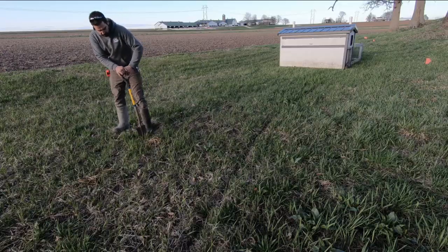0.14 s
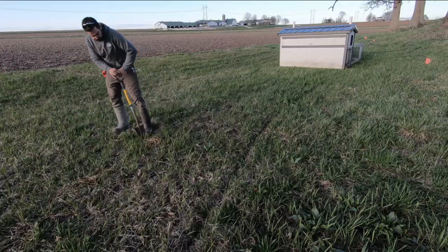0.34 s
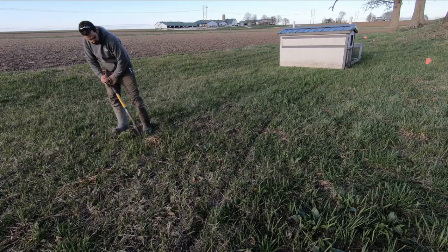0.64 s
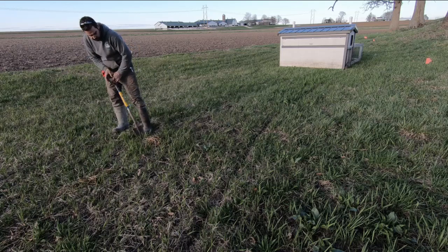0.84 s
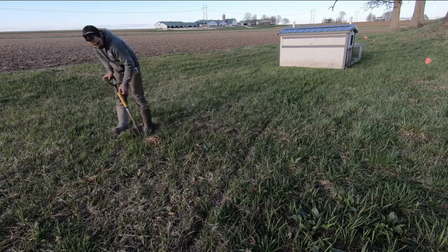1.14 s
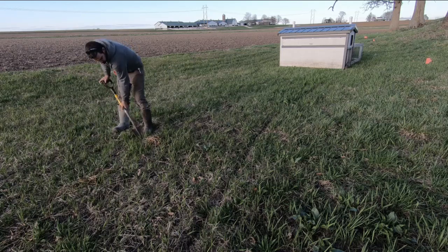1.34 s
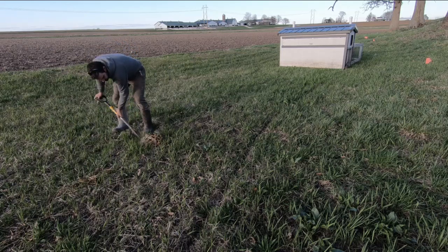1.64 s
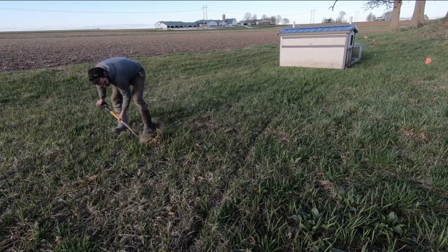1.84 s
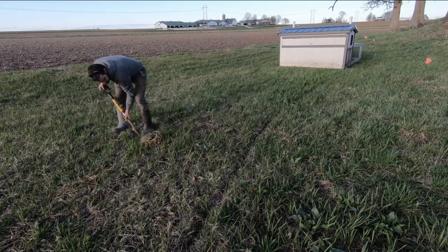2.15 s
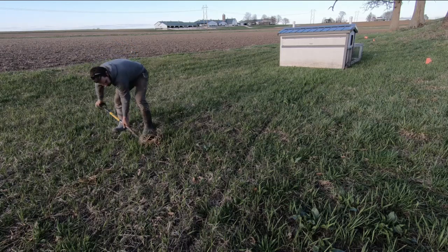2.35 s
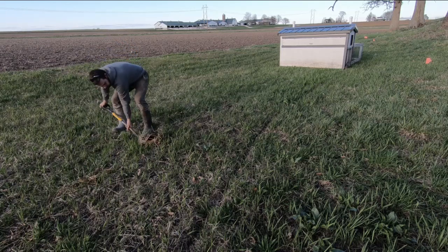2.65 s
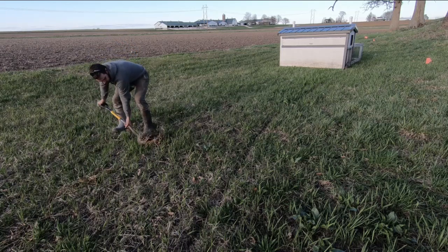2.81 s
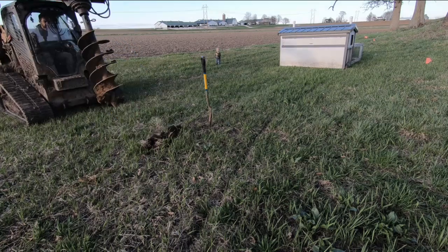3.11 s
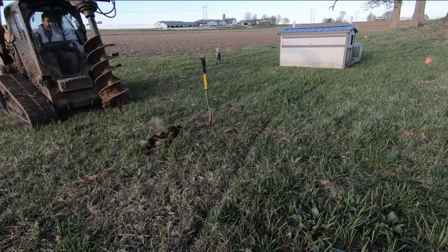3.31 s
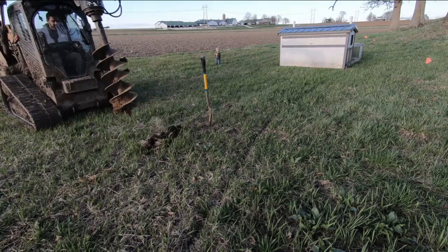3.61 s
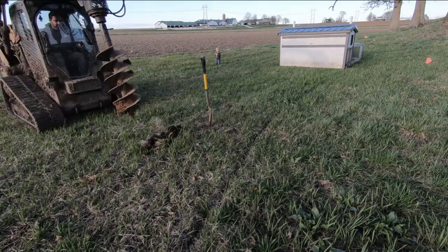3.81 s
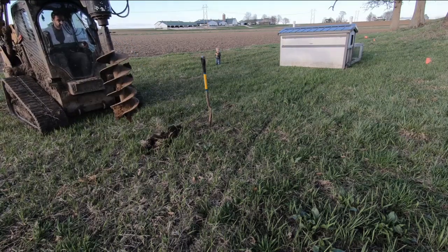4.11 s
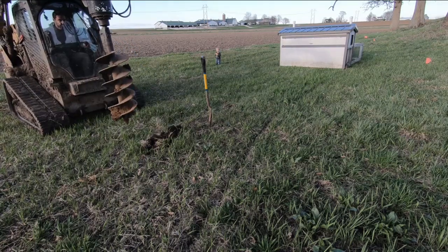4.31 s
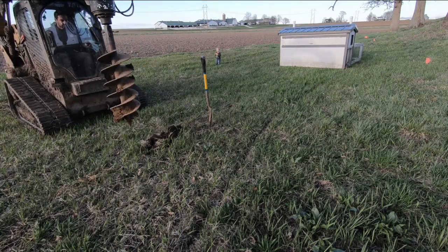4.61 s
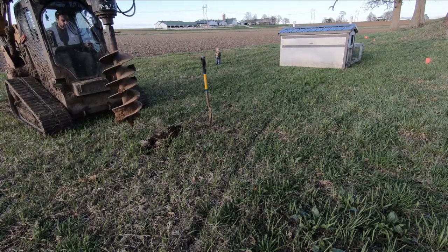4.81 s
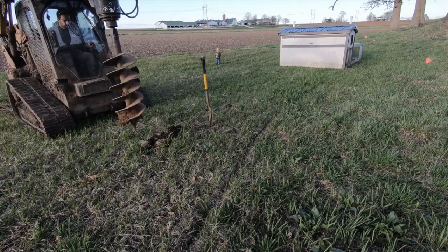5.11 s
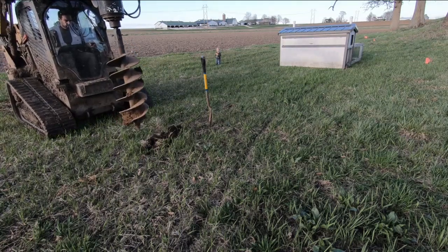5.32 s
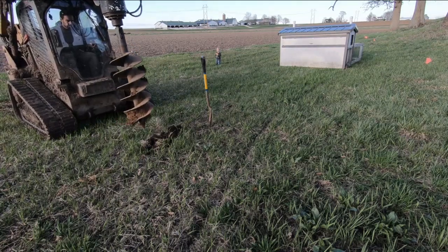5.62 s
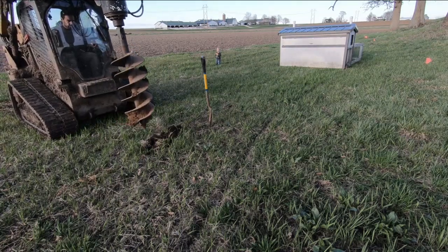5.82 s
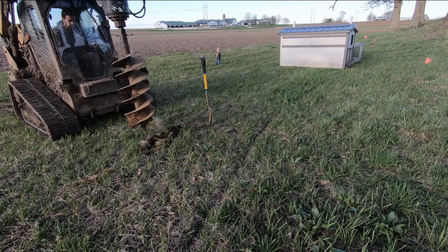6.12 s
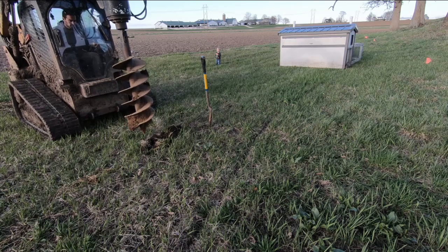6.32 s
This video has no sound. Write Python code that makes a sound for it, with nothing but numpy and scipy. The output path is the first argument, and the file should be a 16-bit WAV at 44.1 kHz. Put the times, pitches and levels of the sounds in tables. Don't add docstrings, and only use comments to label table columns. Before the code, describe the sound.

In an open field a diesel loader idles steadily far off while a spade rubs soil and ticks on grit. Wind swells into low buffeting and a faint bird whistles. At about three seconds it cuts to the loader close by, revving high with knocking and whine, a metallic clink and low thumps, then a growing exhaust boom as the engine labours. Camera microphone, wind-struck.

```python
import sys
import numpy as np
from scipy import signal
from scipy.fft import rfft, irfft, next_fast_len
from scipy.io import wavfile
from scipy.ndimage import uniform_filter1d, map_coordinates

SR = 44100
rng = np.random.default_rng(int(sys.argv[2]) if len(sys.argv) > 2 else 0)


def voltage_ratio(decibels):
    exponent = np.asarray(decibels, float) / 20
    return 10 ** exponent


def to_wav(s):
    ch = np.atleast_2d(s).T
    pcm = np.round(np.clip(ch, -1, 1) * 32767)
    wavfile.write(sys.argv[1], SR, pcm.astype(np.int16))


N = 284489
T = np.arange(N) / SR
CHANGE_S = 3.037
UNSTEADY_DB = 0.6
FIRING_SCATTER_DB = 1


def unit(x):
    return x / np.sqrt(np.mean(x ** 2) + 1e-20)


def along(points, hz):
    f, v = np.transpose(points)
    return np.interp(np.log(hz + 1), np.log(f + 1), v)


def curves(rows):
    s, *cols = np.transpose(rows)
    return [np.interp(T, s, c) for c in cols]


def wobble(rate):
    coarse = T[::16]
    knots = rng.standard_normal(int(N * rate / SR) + 4)
    return np.interp(T, coarse, map_coordinates(knots, [coarse * rate]))


def swells(rows):
    coarse = T[::16]
    power = sum(voltage_ratio(2 * db - 15.4 * ((coarse - s) / half) ** 2) for s, half, db in rows)
    return np.interp(T, coarse, np.sqrt(power))


def filtered(x, response):
    m = next_fast_len(N + SR // 2)
    return irfft(rfft(x, m) * response(np.fft.rfftfreq(m, 1 / SR)), m)[..., :N]


def above(hz, edge_hz):
    return 1 / (1 + (edge_hz / (hz + 1)) ** 6)


def tone(turns, multiple, blur, sway_db):
    phase = 2 * np.pi * multiple * turns + blur * np.sqrt(multiple) * wobble(14) + 7 * rng.random()
    return np.sqrt(2) * voltage_ratio(sway_db * wobble(9)) * np.sin(phase)


def clatter(turns, spectrum, depth_db, scatter_db):
    # centre in Hz, width in Hz, boost in dB.
    panels = [(459, 33, 6), (606, 46, 0.5), (1160, 260, 3), (1495, 56, 1.5), (1690, 38, 9), (2370, 46, 3),
              (3040, 180, 2.5), (3905, 300, 5), (4700, 490, 4)]
    firing = 2 * turns
    size = rng.standard_normal(int(firing[-1]) + 2)[firing.astype(int)]
    puff = voltage_ratio((depth_db + scatter_db * size) * np.exp(-3 * (firing % 1)))
    noise = rng.standard_normal((2, N))
    low = filtered(noise, lambda f: 1 - above(f, 732))
    noise = low + unit(puff) * filtered(noise, lambda f: above(f, 672))
    ring_db = lambda f: sum(db / (1 + (2 * (f - c) / w) ** 2) for c, w, db in panels)
    return filtered(noise, lambda f: voltage_ratio(along(spectrum, f) + ring_db(f)))


def knocks(turns, modes):
    cylinders = [0, -12, -9, -4.5]
    loud_firing_s = 6.217
    count = np.floor(2 * (turns - turns[round(loud_firing_s * SR)])).astype(int)
    at = np.flatnonzero(np.diff(count)) + 1
    blows = np.zeros(N)
    blows[at] = voltage_ratio(np.take(cylinders, count[at] % 4) + FIRING_SCATTER_DB * rng.standard_normal(N)[at])
    t = T[:SR // 10]
    ring = sum(voltage_ratio(db - 60 * t / t60) * np.sin(2 * np.pi * hz * t) for hz, db, t60 in modes)
    soft_onset = 1 - np.exp(-t / 0.0033)
    return signal.fftconvolve(blows, ring * soft_onset)[:N]


def idling():
    idle_orders = [2, 4, 6, 8, 12, 13, 16, 22.7, 24, 26, 29.4, 36, 48, 50, 56, 58, 59, 82, 84]
    idle_levels = [-58, -58, -54, -52.5, -55, -59, -68, -60, -59, -59.5, -62.5, -66.5, -68, -73.5, -71.5,
                   -74, -66.5, -70.5, -76]
    # frequency in Hz, level in dB per Hz.
    far_tone = [(88, -26.5), (150, -5.5), (199, -8), (251, -9.5), (362, -18), (472, -10.5), (888, -20.5),
                (965, -20.5), (1370, -20.5), (1670, -25.5), (2000, -28), (2450, -28), (3530, -34.5),
                (5250, -34.5), (7960, -58.5), (10300, -98), (17500, -120)]
    # frequency in Hz, level in dB, t60 in seconds.
    idle_modes = [(1192, -1, 0.044), (1420, -4, .04), (1664, -4.5, 0.046), (990, -3, 0.054),
                  (692, -2, 0.04), (2400, -10, 0.033), (485, 0, 0.064)]
    # time in seconds, level under 420 Hz in dB.
    bass_release = [(0, -8.5), (.42, -9), (.55, -0.5), (3.1, 3)]
    idle_hz, block_db, knock_db = 20.0, -50.5, -55.5
    turns = np.cumsum(idle_hz * (1 + 0.001988 * wobble(2.007))) / SR
    block = clatter(turns, far_tone, depth_db=3.5, scatter_db=FIRING_SCATTER_DB)
    x = voltage_ratio(block_db + UNSTEADY_DB * wobble(5.97)) * unit(block)
    for k, db in zip(idle_orders, idle_levels):
        x[0] += voltage_ratio(db) * tone(turns, k, blur=0.031, sway_db=0.0)
    x[0] += voltage_ratio(knock_db) * knocks(turns, idle_modes)
    bass = filtered(x, lambda f: 1 - above(f, 420))
    x = x - bass + bass * voltage_ratio(curves(bass_release)[0])
    return x * np.clip((CHANGE_S - T) / 0.0018, 0, 1)


def buffet(response, even):
    x = unit(filtered(rng.standard_normal(N), response))
    power = np.abs(uniform_filter1d(uniform_filter1d(x * x, 1300), 1300))
    return unit(x / (power + 0.055) ** (even / 2))


def wind():
    # time in seconds, level in dB.
    gusts = [(0, -48), (.2, -47), (.37, -49.5), (.5, -58), (.85, -61), (1.45, -49.5), (2.04, -50.5),
             (2.15, -40.5), (2.45, -30.5), (2.87, -32.5), (2.97, -44), (3.1, -43.5), (3.45, -54),
             (3.9, -38.5), (4.55, -49), (5.2, -38), (5.7, -34.5), (6.45, -35)]
    # centre in seconds, half length in seconds, level in dB.
    flurries = [(.12, .05, -51), (.58, 0.026, -50), (1.3, 0.24, -43), (2.13, 0.032, -38),
                (2.24, 0.061, -33.5), (2.46, 0.036, -28.5), (2.56, 0.054, -25), (2.87, 0.038, -35.5),
                (3.03, 0.031, -37.5), (4.24, 0.07, -30), (5.13, 0.044, -33), (5.7, .08, -37.5),
                (6.26, 0.084, -29.5), (6.42, 0.066, -25.5)]
    # centre in seconds, half length in seconds, level
    # in dB.
    slaps = [
        (2.26, 0.068, -31.5),
        (5.5, 0.0204, -41),
        (5.73, 0.037, -29),
        (5.85, 0.026, -35.5),
        (6.37, 0.056, -23),
    ]
    gusty_db, flutter_db, across_db = 4.5, -3, -3
    strength_db, = curves(gusts)
    flurry = np.hypot(voltage_ratio(strength_db + flutter_db + gusty_db * wobble(8)), swells(flurries))
    deep = buffet(lambda f: above(f, 27) * (1 - above(f, 60)), even=0.5)
    flutter = buffet(lambda f: above(f, 38) / (1 + (f / 135) ** 5.85), even=0.38)
    common = voltage_ratio(strength_db + gusty_db * wobble(6.1)) * deep + flurry * flutter
    opposed = buffet(lambda f: above(f, 18) / (1 + (f / 110) ** 4.3), even=0.4)
    opposed = opposed * voltage_ratio(across_db) * np.hypot(voltage_ratio(strength_db), flurry)
    opposed += swells(slaps) * buffet(lambda f: above(f, 40) / (1 + (f / 130) ** 3.3), even=0.6)
    return common, np.where(T < CHANGE_S, 0.7, 0.05) * common + opposed


def rustle():
    # centre in seconds, half length in seconds, level in dB.
    strokes = [(.06, 0.053, -73), (.64, .05, -82), (1.55, 0.15, -76.5), (1.74, 0.081, -71.5),
               (2.42, 0.13, -76.5), (2.89, .02, -72), (2.93, 0.012, -67), (3.0, 0.16, -67.5),
               (3.13, 0.047, -67), (3.3, 0.2, -67.5), (3.72, 0.11, -62.5), (3.85, 0.081, -72),
               (4.22, 0.025, -73), (4.52, 0.048, -81), (5.25, .03, -84.5), (5.62, 0.18, -69.5),
               (5.71, .03, -77), (6.04, 0.13, -75.5), (6.37, 0.027, -70.5)]
    # frequency in Hz, level in dB.
    grit = [(1500, -19.5), (2700, -8), (4000, 0), (5500, 1), (7000, -11.5), (8500, -21.5), (10000, -30),
            (11400, -44), (12200, -25), (14000, -23), (15300, -30), (15800, -44.5)]
    steady_db = np.where(T < CHANGE_S, -100, -79)
    grains = voltage_ratio(2.8 * wobble(90)) * rng.standard_normal((2, N))
    grains = unit(filtered(grains, lambda f: voltage_ratio(along(grit, f))))
    return voltage_ratio(8.0) * np.hypot(voltage_ratio(steady_db), swells(strokes)) * grains


def spade_ticks():
    # time in seconds, peak in dB, pitch in Hz.
    tick_rows = [(.2404, -53, 4370), (1.0704, -58, 4470), (1.6534, -42, 4400), (2.4727, -49, 4300),
                 (2.5364, -52, 3000), (2.851, -49, 3500), (2.883, -44.5, 5850), (2.896, -44, 6200),
                 (2.9, -45, 6240), (2.9045, -44, 5500), (2.9207, -27, 6100), (2.9213, -32, 4000),
                 (3.129, -43, 4860), (3.2675, -46, 3850), (3.661, -46, 6200), (4.2128, -48.5, 4600),
                 (4.2797, -50, 4070), (4.4373, -48, 3790), (4.4882, -49, 3950), (5.255, -48.5, 5850),
                 (5.575, -54, 5940), (5.645, -54, 5500), (5.7054, -50, 5500), (6.383, -47, 4200)]
    spread, edge_db, t60 = 0.4, -30.5, 0.0043
    x = np.zeros(N + 600)
    t, f = np.arange(600) / SR - 0.001, np.fft.rfftfreq(600, 1 / SR)
    cracks = rng.standard_normal((18, 600))
    envelope = voltage_ratio(-60 * np.abs(t) / np.where(t < 0, 0.0005, t60))
    click = 5 * (np.abs(t) < 0.6 / SR)
    edge = voltage_ratio(edge_db) * above(f, 1200) * (1 - above(f, 15000))
    for k, (s, db, hz) in enumerate(tick_rows):
        body = np.exp(-(np.log((f + 1) / hz) / spread) ** 2) * (1 - above(f, 7600)) ** 2
        tick = irfft(rfft((cracks[k % len(cracks)] + click) * envelope) * (body + edge))
        x[round((s - 0.001) * SR):][:600] += voltage_ratio(db) * tick / np.abs(tick).max()
    return x[:N]


def jolts():
    # start in seconds, frequency in Hz, level in dB, t60 in seconds.
    thumps = [(3.059, 270, -35, 0.14), (2.115, 75, -30, .15), (2.27, 50, -29, .12), (2.325, 75, -27.5, .12),
              (2.855, 65, -27, 0.13), (2.468, 124, -25, 0.17), (2.72, 71.7, -24, 0.14),
              (3.255, 335, -33, .1), (3.268, 646, -30, .03), (3.321, 1130, -30, .025), (3.72, 306, -31, .2),
              (3.68, 890, -38, .15), (3.045, 688, -38.5, 0.18), (3.19, 960, -39, 0.11),
              (6.38, 215, -26.5, 0.13), (2.555, 110.5, -21.5, 0.17), (3.231, 552, -21.5, 0.042),
              (3.697, 168, -19, 0.07), (3.709, 141, -24, 0.059), (3.038, 452, -33, .12),
              (3.975, 135, -25, .08), (4.262, 140, -23, .09), (3.984, 80, -18, 0.067),
              (4.212, 70.4, -12, 0.052), (4.24, 60, -21, 0.054), (4.271, 81, -17, 0.058)]
    x = np.zeros(N)
    for s, hz, db, t60 in thumps:
        u = np.maximum(T - s, 0)
        x -= voltage_ratio(db - 60 * u / t60) * (1 - np.exp(-u / 0.00092)) * np.sin(2 * np.pi * hz * u)
    return x


def gliding_tones():
    # start in seconds, length in seconds, start in Hz,
    # end in Hz, level in dB.
    note_rows = [(2.13, .1, 4540, 4500, -66), (2.2, .09, 4520, 4440, -63), (2.3, .1, 4480, 4470, -72),
                 (2.39, .05, 5950, 5860, -71), (2.43, .08, 5860, 5835, -67), (2.5, .06, 5840, 5840, -70),
                 (2.495, .05, 4830, 4600, -67), (2.53, .07, 4560, 4360, -68), (2.55, .1, 4320, 4240, -69),
                 (2.65, .05, 4230, 4230, -66), (2.655, .04, 5040, 4970, -70), (2.685, .04, 4930, 4905, -59),
                 (2.72, .03, 4905, 4900, -67), (2.765, .07, 4110, 4190, -71), (2.795, .04, 3340, 3220, -64),
                 (2.83, .04, 3270, 3230, -65), (2.86, .07, 3200, 3110, -62), (2.93, .04, 3110, 3100, -67),
                 (3.02, .17, 452, 447, -35.5), (3.12, .53, 1880, 1862, -55), (4.28, .4, 468, 462, -47)]
    x = np.zeros(N)
    waver, swell = wobble(60), wobble(40)
    for s, length, hz0, hz1, db in note_rows:
        u = np.clip((T - s) / length, 0, 1)
        glide = 2 * np.pi * length * (hz0 * u + (hz1 - hz0) * u * u / 2) + 0.5 * waver
        envelope = np.abs(np.sin(np.pi * u)) ** 0.6 * (u < 1)
        x += voltage_ratio(db + 1.8 * swell) * envelope * np.sin(glide)
    return x


def with_effort(effort, light_db, heavy_db):
    return voltage_ratio(light_db + (heavy_db - light_db) * effort)


def working_block(turns, fast_hz, effort):
    # frequency in Hz, level in dB per Hz.
    near_tone = [(88, -34), (150, -2), (243, -3.5), (296, -4), (356, -8.5), (457, -7.5), (557, -7.5),
                 (752, -15.5), (873, -15), (1160, -15), (1370, -21.5), (1490, -22), (1840, -23.5),
                 (5710, -33.5), (7960, -56.5), (10300, -94), (17500, -120)]
    noise = clatter(turns, near_tone, depth_db=0.5, scatter_db=2.0)
    low = filtered(noise, lambda f: 1 - above(f, 660))
    high = filtered(noise, lambda f: above(f, 2010))
    x = unit(low) * voltage_ratio(UNSTEADY_DB * wobble(10))
    x += unit(noise - low - high) * voltage_ratio(-4 + 0.24 * fast_hz)
    x += unit(high) * voltage_ratio(-14 + 0.35 * fast_hz + 1.4 * effort)
    return x * voltage_ratio(-43 + 0.35 * fast_hz + UNSTEADY_DB * wobble(8))


def exhaust(turns, boom_db, effort):
    # centre in seconds, half length in seconds, level in dB.
    octave_rows = [
        (3.3, 0.14, -41.5),
        (3.52, 0.19, -41),
        (4.6, .3, -45),
        (4.02, 0.13, -45),
        (4.3, 0.091, -38),
    ]
    octave = np.hypot(with_effort(effort, -51, -37), swells(octave_rows))
    boom = voltage_ratio(boom_db) * tone(turns, 2, blur=0.04, sway_db=0.14)
    return boom + octave * tone(turns, 4, blur=0.11, sway_db=-0.5)


def gear_whine(turns, effort):
    lasting = [1, 3, 6]
    # at light effort in dB, at heavy effort in dB.
    lasting_levels = [(-60, -44.5), (-60, -49.5), (-59, -51.5)]
    passing = [5.5, 42, 12, 13, 14.5, 15, 16, 16.5, 17, 18, 24, 27, 32, 33, 36, 40, 50, 51, 28]
    # centre in seconds, half length in seconds, level in dB.
    bouts = [
        [(4.0, .5, -51), (6.0, .6, -49)],
        [(3.45, .35, -58)],
        [(3.35, .3, -51), (3.85, .4, -48.5), (4.25, .3, -50), (5.2, .5, -49.5), (6.1, .7, -48)],
        [(3.85, .15, -50)],
        [(3.9, .4, -57), (5.6, 1.6, -55)],
        [(3.25, .9, -49.5), (5.6, .4, -60)],
        [(4.1, .6, -53), (5.6, .3, -59)],
        [(3.5, .7, -50), (5.2, 2, -56)],
        [(5.5, 1.2, -48)],
        [(3.3, .2, -49), (3.65, .25, -54), (4.05, .25, -51), (4.5, .45, -49), (5.1, .2, -54), (5.6, .3, -57)],
        [(3.75, .5, -55), (4.55, .5, -56)],
        [(3.5, .6, -61), (5.1, .5, -56), (5.75, .3, -53), (6.15, .6, -51)],
        [(5.9, 1.2, -60)],
        [(4.9, .3, -62), (5.6, .3, -58)],
        [(3.6, .35, -55), (4.08, .2, -54), (4.6, .3, -60)],
        [(5.3, .6, -64)],
        [(5.3, .3, -63)],
        [(5.9, .8, -66)],
        [(5.75, .2, -55), (6.15, .5, -57)],
    ]
    x = np.zeros(N)
    for k, (light_db, heavy_db) in zip(lasting, lasting_levels):
        gain = with_effort(effort, light_db, heavy_db) * voltage_ratio(2.2 + 1.5 * wobble(1.5))
        x += gain * tone(turns, k, blur=0.03, sway_db=1.5)
    for k, rows in zip(passing, bouts):
        x += swells(rows) * tone(turns, k, blur=0.03, sway_db=1.2)
    return x


def pump_housing(turns, shaft_hz):
    # centre in seconds, half length in seconds, level in dB.
    singing = [(3.3, 0.14, -53.5), (3.8, 0.23, -47), (4.55, 0.16, -50.5), (4.9, 0.25, -51),
               (5.3, 0.15, -53), (5.62, 0.12, -48.5), (5.9, 0.17, -54), (3.6, .12, -49.5),
               (4.2, 0.18, -59.5)]
    centre_hz, half_hz = 1170, 33
    gain = np.hypot(voltage_ratio(-60.5), swells(singing)) * voltage_ratio(1.5)
    x = np.zeros(N)
    for k in (32, 34, 36):
        resonance = 1 / (1 + ((k * shaft_hz - centre_hz) / half_hz) ** 4)
        x += gain * resonance * tone(turns, k, blur=0.03, sway_db=1.5)
    return x


def working():
    # time in seconds, shaft speed in Hz, exhaust boom in dB, pump pressure in dB.
    revs = [(3.05, 37.27, -37.5, -66), (3.28, 36.04, -42.5, -47.5), (3.62, 35.91, -40.5, -51.5),
            (3.77, 36.35, -33.5, -48), (4.0, 35.26, -36, -50.5), (4.33, 34.47, -28.5, -44.5),
            (4.6, 34.19, -32, -38.5), (4.85, 32.98, -27.5, -36), (5.16, 32.45, -22, -43),
            (5.57, 33, -18.5, -39), (5.7, 32.73, -18, -42.5), (5.89, 32.86, -19.5, -38),
            (6.22, 32.69, -18, -36), (6.45, 32.98, -22, -39.5)]
    # frequency in Hz, level in dB, t60 in seconds.
    block_modes = [(1495, 4.5, 0.03), (1428, -9, 0.028), (1650, -8.5, 0.04), (2045, -13.5, .04),
                   (3220, -15.5, .02), (601, -5.5, 0.049), (896, -9, .04), (1212, -8.5, 0.035),
                   (455, -12.5, 0.069)]
    light_db, heavy_db, full_load_hz = -42, -18, 33
    shaft_hz, boom_db, pump_db = curves(revs)
    turns = np.cumsum(shaft_hz) / SR
    effort = (boom_db - light_db) / (heavy_db - light_db)
    x = working_block(turns, shaft_hz - full_load_hz, effort)
    x[0] += exhaust(turns, boom_db, effort)
    x[0] += voltage_ratio(pump_db) * tone(turns, 9, blur=0.021, sway_db=1.5)
    x[0] += gear_whine(turns, effort)
    x[0] += pump_housing(turns, shaft_hz)
    x[0] += with_effort(effort, -38.5, -32) * knocks(turns, block_modes)
    return x * np.clip((T - CHANGE_S) / 0.0021, 0, 1)


def clinks():
    # start in seconds, frequency in Hz, level in dB, t60 in seconds.
    pins = [(3.707, 3600, -30.5, 0.044), (3.709, 5750, -44, 0.036), (3.717, 5800, -47, .03),
            (3.709, 2100, -40, 0.033), (3.737, 6300, -48, .05), (3.9, 2300, -49, 0.038),
            (3.721, 3203, -34.5, 0.11), (3.722, 3047, -36, 0.16), (3.724, 6100, -44, 0.061),
            (3.671, 6000, -50, 0.013), (6.383, 6230, -50, 0.025)]
    x = np.zeros(N)
    shiver, quiver = wobble(150), wobble(200)
    for s, hz, db, t60 in pins:
        u = np.maximum(T - s, 0)
        envelope = voltage_ratio(db - 60 * u / t60 + 2.1 * shiver) * (1 - np.exp(-u / 0.00052))
        x += envelope * np.sin(2 * np.pi * hz * u + 0.71 * quiver)
    return x


def scene():
    # time in seconds, level over 1.8 kHz in dB.
    treble = [(0, 1), (.8, -0.5), (1, 1), (1.9, 2), (2.15, -1.5), (2.7, -2.5), (2.85, 0), (4.2, -1),
              (4.6, -1.5), (5.2, -0.5), (5.35, 1.5), (5.6, 0), (6.45, 0)]
    # frequency in Hz, left over right in dB.
    lean = [(60, -0.5), (120, -2), (240, -0.5), (480, -3), (950, 4.0), (1890, 9.5), (3770, 2), (7510, -1.5)]
    # frequency in Hz, lead in radians.
    lead = [(0, 0), (430, 0.2), (690, 0.8), (1460, 0.72), (2330, 0.2), (2580, -0.5), (3190, -1.1),
            (4740, 0.4), (5170, 0.3), (5510, 0.8), (6120, 0.9), (6460, 1.4), (6800, 1.0), (7670, 1.3)]
    # frequency in Hz, level in dB.
    scatter = [(100, -24), (400, -21.5), (1000, -9), (3000, -16.5), (8000, 1.5)]
    engine = idling() + working()
    engine = engine + (voltage_ratio(curves(treble)[0]) - 1) * filtered(engine, lambda f: above(f, 1800))
    direct, other = engine + rustle()
    direct = direct + spade_ticks() + gliding_tones() + clinks()
    ratio = lambda f: voltage_ratio(along(lean, f)) * np.exp(1j * along(lead, f))
    side = filtered(direct, lambda f: (ratio(f) - 1) / (ratio(f) + 1))
    side += filtered(other, lambda f: voltage_ratio(along(scatter, f)))
    common, across = wind()
    mid = direct + common + jolts()
    return np.array([mid + side + across, mid - side - across])


def low_pass(x):
    return signal.sosfilt(signal.butter(12, 15700, fs=SR, output="sos"), x)


def record(dry):
    # frequency in Hz, level in dB.
    air = [(6000, -24.5), (7500, -6.5), (9000, -5), (10000, -24), (11500, -30), (11900, -5), (12700, -1.5),
           (13000, -27.5), (16000, -42.5)]
    # frequency in Hz, level in dB.
    stereo_tint = [(1500, -0.5), (3000, 1), (5000, -4), (6300, 5), (7500, 5), (7950, 5), (8200, 0),
                   (10500, 2.5), (11300, 9), (12300, -1), (15000, 0)]
    opens_s, opening_s = np.where(T < CHANGE_S, 1.93, 4.89), 0.61
    dulls_s, dull_hz = 3.9, 13300
    width = np.clip((T - opens_s) / opening_s, 0, 1)
    hiss = filtered(rng.standard_normal((2, N)), lambda f: voltage_ratio(along(air, f)))
    hiss = voltage_ratio(-93.5) * unit(hiss)
    mid, side = (dry[0] + dry[1]) / 2, (dry[0] - dry[1]) / 2
    tinted = filtered(mid, lambda f: voltage_ratio(along(stereo_tint, f)))
    mid = (1 - width) * mid + width * tinted + hiss[0]
    mid = mid - np.clip((T - dulls_s) / 0.3, 0, 0.9) * filtered(mid, lambda f: f > dull_hz)
    side = width * (side + voltage_ratio(5.5) * hiss[1])
    both = np.array([mid + side, mid - side])
    both = both / (1 + np.abs(both / 0.31) ** 8) ** (1 / 8)
    return low_pass(both)


dry = scene()
out = record(dry)
to_wav(out)
```